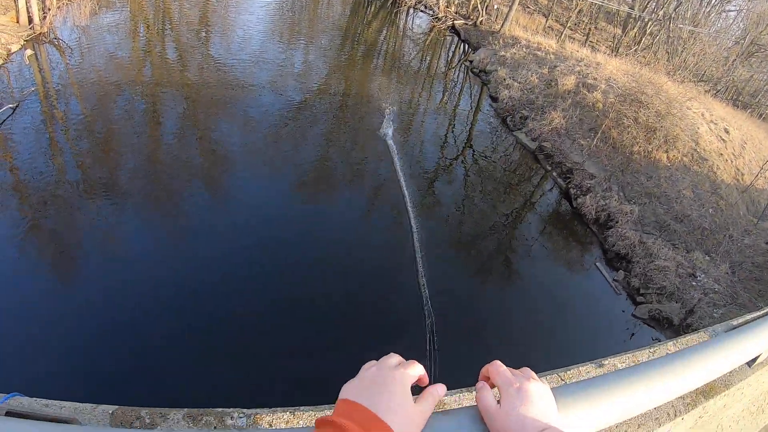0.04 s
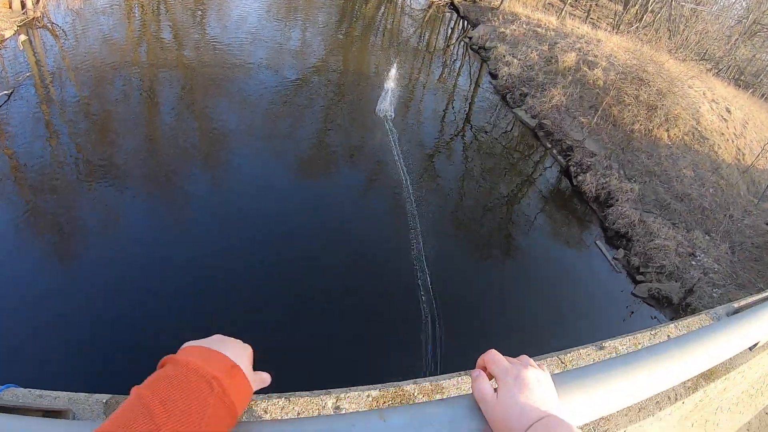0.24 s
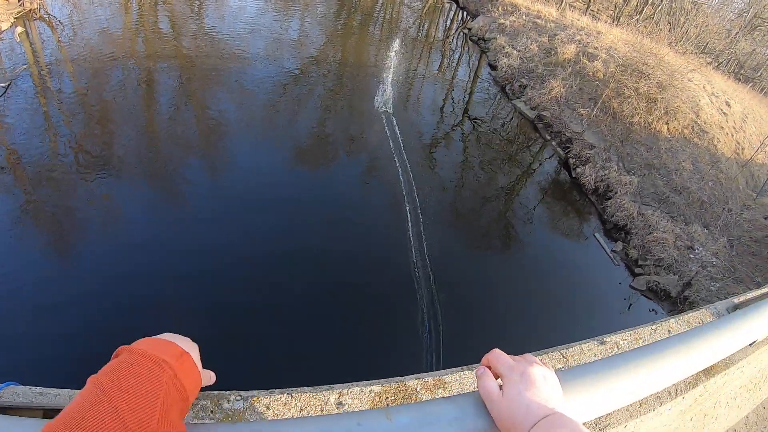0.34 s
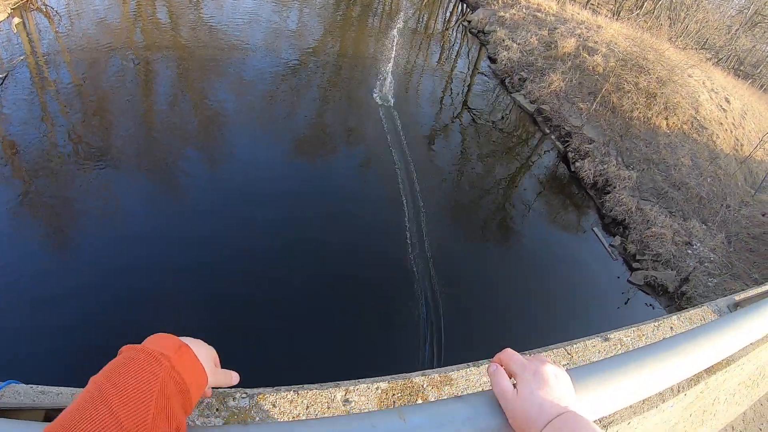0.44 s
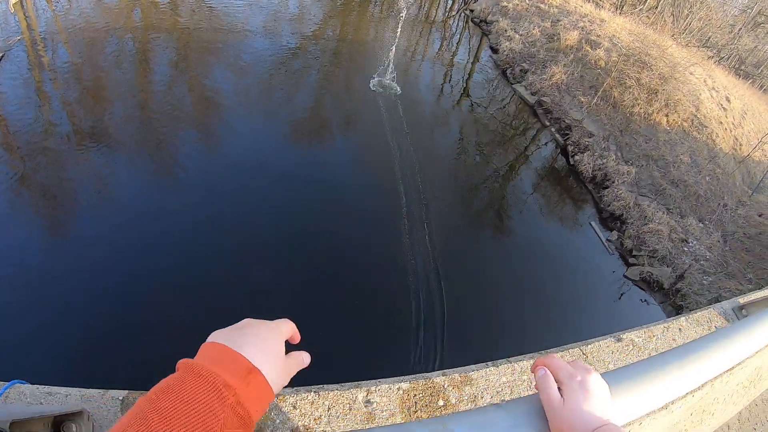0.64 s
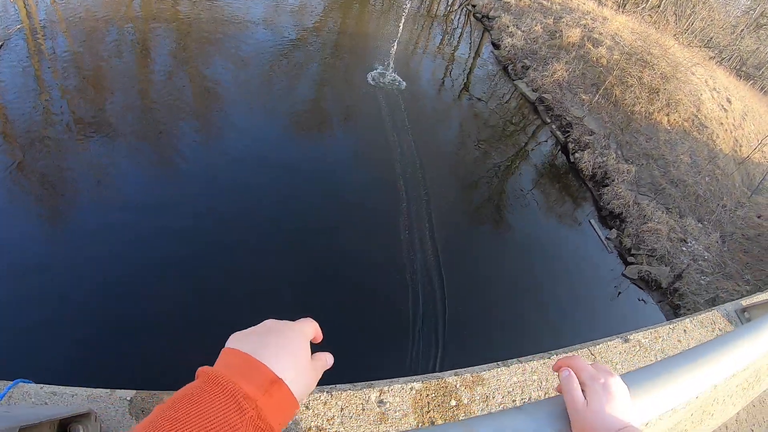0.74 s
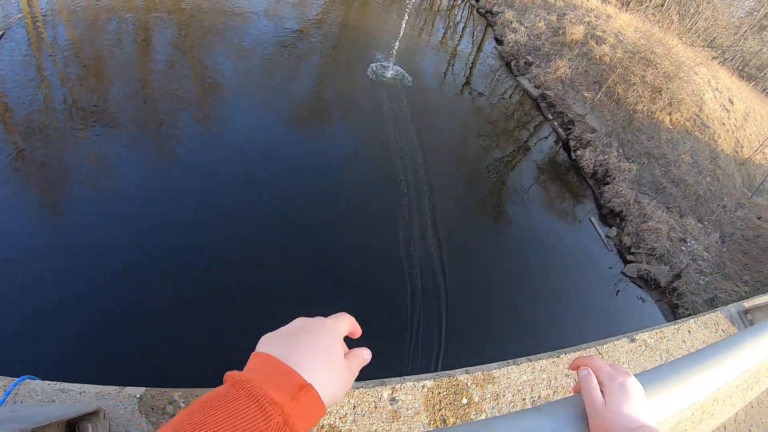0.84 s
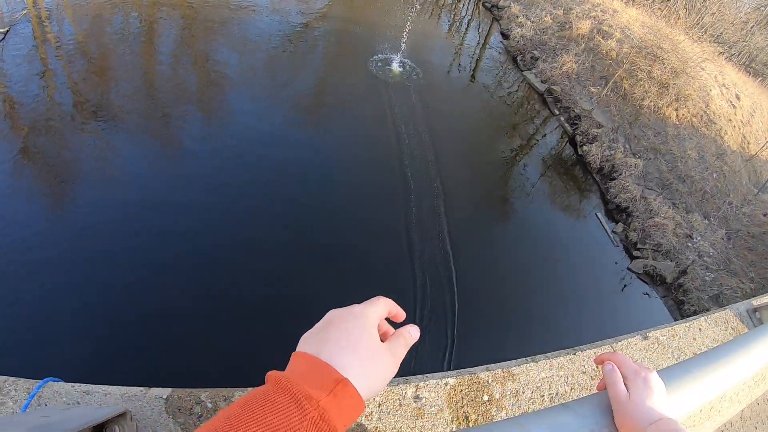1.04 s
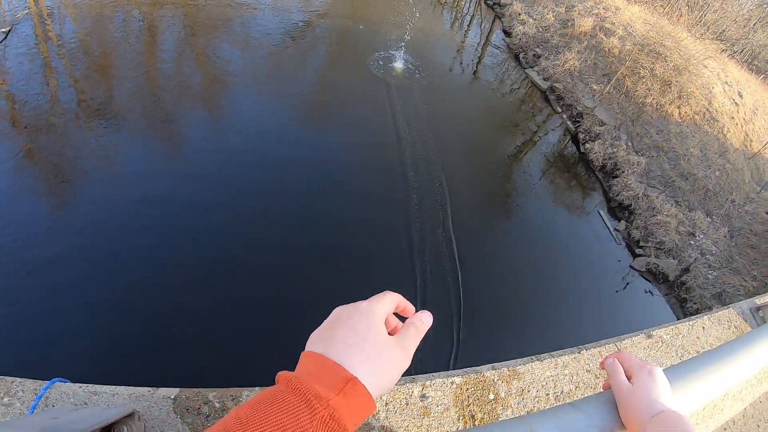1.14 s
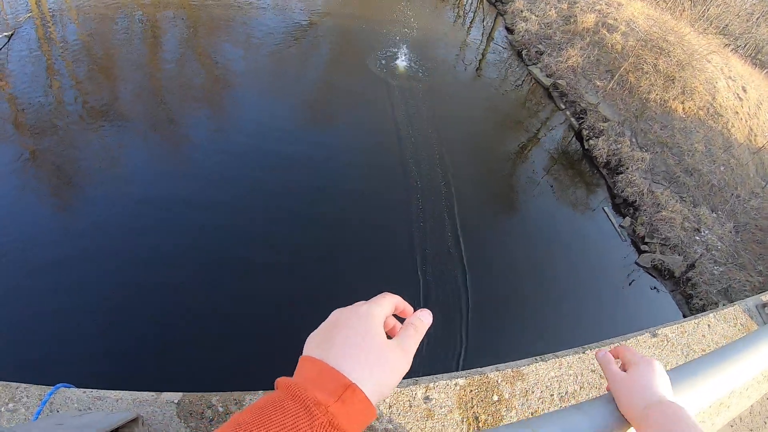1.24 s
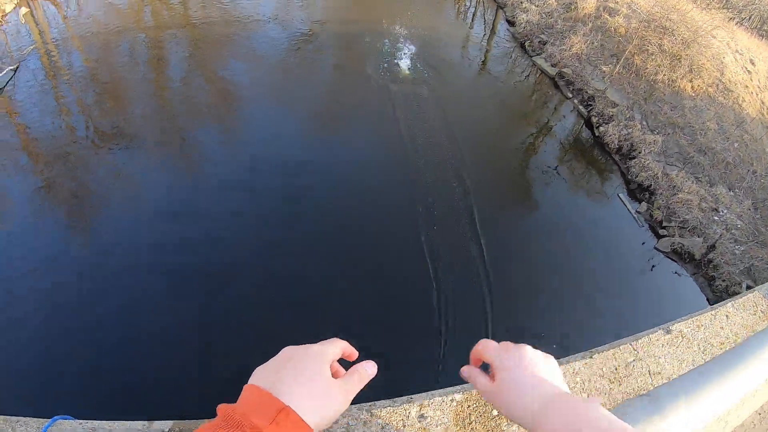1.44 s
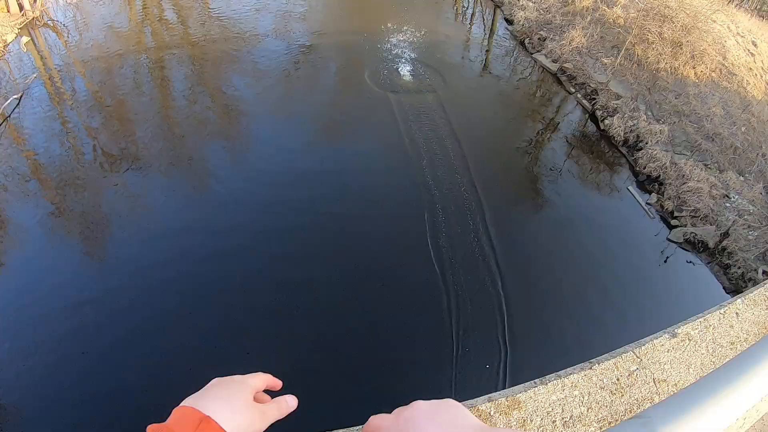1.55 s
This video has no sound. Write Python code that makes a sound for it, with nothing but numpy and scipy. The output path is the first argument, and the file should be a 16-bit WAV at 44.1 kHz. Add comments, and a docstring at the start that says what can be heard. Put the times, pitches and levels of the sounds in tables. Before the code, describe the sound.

A weight slaps into a river with a deep plunk, then gurgles and spray patter back. Outdoors on a bridge, a rope hisses over the railing slightly to the right while light wind buffets the microphone.

```python
"""A weight on a rope plunks into a river below a bridge: it slaps the surface, then its air cavity
pinches off and rings deep. Torn water splashes, trapped air gulps and gurgles, and the thrown water
falls back as spray and drops, while bridge and banks return a faint echo. The rope hisses and sings
over the railing a little to the right, and light wind buffets the microphone above the river's wash."""
import sys
import numpy as np
from scipy import signal
from scipy.fft import rfft, irfft
from scipy.io import wavfile

SR = 44100
rng = np.random.default_rng(int(sys.argv[2]) if len(sys.argv) > 2 else 0)


def generate_wav(sig):
    """Save sig (samples, or channels by samples) to the path in sys.argv[1] as 16-bit PCM at SR."""
    pcm = np.round(np.clip(np.atleast_2d(sig).T, -1, 1) * 32767).astype(np.int16)
    wavfile.write(sys.argv[1], SR, pcm)


N = 70560
TIME = np.arange(N) / SR
BINS = np.fft.rfftfreq(N, 1 / SR)
BUBBLE_RISE_S, TILT_PIVOT_HZ = 0.002, 1880

# The plunk's notes: the main deep ring, then a low boom and two short overtones.
# Each row: pitch in Hz, peak in dB, t60 in seconds.
CAVITY_NOTES = [(142.9, -8, 0.19), (63.2, -23, 0.46), (381, -21.5, 0.098), (538, -21.5, 0.037)]
# Slapback off bridge and banks. Each row: delay in seconds, level against the direct note in dB.
PLUNK_ECHOES = [(0.06, -11.5), (0.089, -24), (0.127, -24), (0.163, -23), (0.21, -25)]
def plunk(start=0.1975, rise=0.0046):
    """The cavity behind the weight pinches off and rings; its main note echoes back."""
    direct = sum(ring(start, hz, db, t60, rise) for hz, db, t60 in CAVITY_NOTES)
    hz, db, t60 = CAVITY_NOTES[0]
    return direct + sum(ring(start + delay, hz, db + echo_db, t60, rise)
                        for delay, echo_db in PLUNK_ECHOES)


# Sheets of water tearing. Each row: start in seconds, hold in seconds, level in dB, t60 in seconds.
SPLASH_BURSTS = [(0.056, 0.0057, -34, 0.15), (0.079, 0.0096, -42.5, 0.062), (0.126, 0.033, -36, 0.016),
                 (.199, 0.0095, -33, 0.21), (0.356, 0.0055, -36, 0.026), (0.399, 0.043, -37.5, 0.67)]
# Splash EQ. Each row: frequency in Hz, gain in dB.
SPLASH_EQ = [(100, -8), (350, -4.5), (700, -8), (1100, -2), (2100, 3), (3500, 1), (4600, -3), (5600, -14),
             (8500, -23.5), (11000, -33), (15500, -35)]
def splashes():
    """Ragged bursts of torn water as the weight goes in and the hole closes."""
    level = sum(amp(db) * envelope(start, 0.0018, hold, t60) for start, hold, db, t60 in SPLASH_BURSTS)
    return level * flutter(rate_hz=400, depth=0.079) * coloured(patter(), SPLASH_EQ)


# Wet smacks. Each row: start in seconds, level in dB, treble tilt in dB per octave.
SLAP_HITS = [(.0542, -29, -2), (0.0626, -28, 0), (0.0692, -24.5, -1.5), (0.1021, -35.5, 4.5),
             (.127, -34, -1), (0.143, -35, 0), (.157, -31, -1.5), (.353, -32.5, -1.5), (.409, -43, -1),
             (0.457, -29.5, -3.5), (0.893, -38, -3), (1.009, -38, -5), (1.2246, -39, 3), (1.2597, -40, 3),
             (1.318, -32, -2), (1.416, -32, -5), (1.4286, -27.5, -1.5), (1.450, -25.5, -3.5),
             (1.485, -45, 0), (1.555, -26.5, 0.5), (1.5683, -44, 7), (1.5724, -30.5, -0.5),
             (1.5905, -32, 2)]
# Slap EQ. Each row: frequency in Hz, gain in dB.
SLAP_EQ = [(200, -5), (900, -2.5), (2000, 4), (4000, -1), (6000, -7.5), (9500, -18), (15500, -57)]
def slaps(rise=0.000763, t60=0.015, crack_db=7):
    """Lumps and drops of water smack the surface, each a sharp crack and a short fizz."""
    crack = amp(crack_db) * unit(amp(spectrum(SLAP_EQ, BINS)))
    fizz = coloured(white(), SLAP_EQ)
    out = 0
    for start, db, tilt in SLAP_HITS:
        burst = rfft(fizz * envelope(start, rise, 0, t60))
        delay = np.exp(-2j * np.pi * BINS * (start + rise))  # lands the crack on the fizz's peak
        out += (burst - crack * delay) * amp(db + tilt * tilt_octaves(BINS))
    return irfft(out, N)


# Single bubbles. Each row: start in seconds, pitch in Hz, peak in dB, t60 in seconds,
# glide in octaves per second.
BUBBLE_NOTES = [(0.042, 208, -38.5, 0.75, 2.5), (0.071, 398, -32, 0.11, -16.5), (.086, 3620, -34, .035, -2),
                (0.09, 165.6, -36.5, 0.41, -1.5), (.135, 616, -38.5, 0.072, 12),
                (.16, 664, -32, 0.14, -6.5), (0.411, 1306, -31, 0.04, 1), (0.892, 358, -30, 0.029, -6),
                (.986, 366, -31.5, 0.03, 8), (1.238, 905, -31, 0.017, -10), (1.267, 1400, -30, 0.02, 8),
                (1.331, 1110, -28, 0.017, 17)]
def bubbles():
    """Smaller air pockets gulp around the plunk and blip among the falling drops."""
    return sum(ring(start, hz, db, t60, BUBBLE_RISE_S, glide)
               for start, hz, db, t60, glide in BUBBLE_NOTES)


# Bubble clusters. Each row: start in seconds, length in seconds, centre pitch in Hz, level in dB.
GURGLE_CLUSTERS = [(0.07, .035, 290, -42), (0.142, .04, 643, -48), (0.404, .05, 1124, -41),
                   (0.469, .035, 323, -39.5), (.48, .045, 967, -48), (.96, .06, 1040, -44),
                   (1.006, .025, 1885, -43), (1.174, 0.046, 906, -47.5), (1.115, 0.072, 280, -41.5)]
def gurgles(count=8, spread_octaves=0.35, t60=0.02):
    """Churned air breaks into short-lived bubbles, scattered in time and size."""
    out = np.zeros(N)
    for start, length, hz, db in GURGLE_CLUSTERS:
        onsets = start + length * (np.arange(count) + rng.random(count)) / count
        pitches = hz * 2 ** (spread_octaves * rng.permutation(np.linspace(-1, 1, count)))
        cluster = sum(ring(at, pitch, 0, t60, BUBBLE_RISE_S) for at, pitch in zip(onsets, pitches))
        out += amp(db) * unit(cluster) * np.sqrt(length * SR / N)  # rms over the cluster's length
    return out


# The spray's ride. Each row: time in seconds, level in dB, treble tilt in dB per octave.
SPRAY_RIDE = [(0, -58, 1), (.05, -54, -1), (.09, -48, 4.5), (.26, -40.5, 1.5), (.335, -42.5, 0),
              (.39, -38, 1), (.45, -38.5, -1), (.53, -40.5, -0.5), (.65, -41.5, -1), (.8, -46, 1),
              (.92, -40, 0.5), (1.01, -39.5, 1.5), (1.1, -41.5, 2), (1.25, -41.5, 2.5), (1.43, -41, 4),
              (1.5, -42.5, 3.5), (1.56, -39.5, 6), (1.6, -41.5, 4.5)]
# Spray EQ. Each row: frequency in Hz, gain in dB.
SPRAY_EQ = [(100, 8), (200, -2), (400, 7), (700, 1), (1100, 1), (1500, -1), (2400, -1), (3600, -3),
            (5000, -11), (8000, -19.5), (9500, -26), (11000, -33.5), (15500, -42.5)]
def spray():
    """Thrown water rains back, brighter as the finest drops land."""
    hz, times, frames = signal.stft(coloured(patter(), SPRAY_EQ), SR, nperseg=256)
    tilt = np.interp(times, TIME, curve(SPRAY_RIDE, column=2))
    frames = frames * amp(tilt_octaves(hz)[:, None] * tilt)
    shower = signal.istft(frames, SR, nperseg=256)[1][:, :N]
    return shower * amp(curve(SPRAY_RIDE)) * flutter(rate_hz=60, depth=0.15)


def patter(bands=48, base_drops_per_s=2800, spread_db=3, q=14, mist_hz=6110, mist_share=0.6):
    """A dense shower of tiny drops, each ringing a few cycles; the finest merge into a smooth mist."""
    drops = np.zeros((2, N))
    for hz in np.geomspace(500, 14000, bands) * rng.uniform(.97, 1.03, bands):
        t = np.arange(0, 2 * q / hz, 1 / SR)
        drop = np.exp(-np.pi * t * hz / q) * np.sin(2 * np.pi * hz * t)
        sizes = amp(spread_db * np.minimum(rng.exponential(1, (2, N)), 4))
        crowd = 1 + (hz / mist_hz) ** 4  # high drops come thicker and softer
        hits = sizes * random_ticks(crowd * base_drops_per_s / bands)
        drops += hz / np.sqrt(crowd) * signal.oaconvolve(hits, drop[None], axes=1)[:, :N]
    return np.sqrt(1 - mist_share) * unit(drops) + np.sqrt(mist_share) * white()


# The rope running out. Each row: time in seconds, level in dB, resonance in Hz,
# relative level of its singing core in dB.
ROPE_RIDE = [(0, -51, 1666, -8), (.5, -49.5, 1649, -6), (.64, -40, 1680, -6.5), (.72, -42, 1724, -1.5),
             (.8, -43.5, 1742, -3.5), (.9, -45.5, 1811, -3.5), (1.02, -45, 1900, -5),
             (1.1, -50.5, 1775, -4), (1.22, -42, 1678, -4), (1.37, -39.5, 1600, -1), (1.44, -38, 1629, -6),
             (1.5, -48, 1663, -3), (1.6, -65, 1620, -7)]
# EQ of the rope's hiss. Each row: frequency in Hz, gain in dB.
ROPE_EQ = [(200, -21), (500, 5.5), (680, -8.5), (900, 1.5), (1400, 4), (2400, -14), (2900, -1.5),
           (3850, -0.5), (4600, -17), (8000, -23.5), (15000, -73)]
def rope(body_db=-3.5, hiss_db=-3.5, stereo_phase_rad=0.48):
    """Fibres rub over the rail: a rough hiss with a singing resonance that drifts with the speed."""
    carrier = np.exp(2j * np.pi * np.cumsum(curve(ROPE_RIDE, column=2)) / SR)
    body = amp(body_db) * waver(width_hz=675)
    core = amp(curve(ROPE_RIDE, column=3)) * waver(width_hz=100)
    spread = np.exp(1j * stereo_phase_rad * np.array([[-.5], [.5]]))
    tone = (carrier * (body + core) * spread).real * pan(db=-7)
    hiss = amp(hiss_db) * coloured(white(), ROPE_EQ) * pan(db=-6)
    return (tone + hiss) * amp(curve(ROPE_RIDE)) * flutter(rate_hz=160, depth=0.42)


# Gusts. Each row: time in seconds, level in dB, left minus right in dB.
WIND_RIDE = [(0, -43.5, 0), (.16, -47, -11), (.25, -31, -4), (.33, -48, -1), (.46, -40.5, 1), (.54, -38, 1),
             (.61, -35, -3), (.72, -36, -6.5), (.76, -31.5, -7), (.85, -32.5, -7), (.92, -37.5, -7),
             (1.02, -37.5, -3), (1.08, -51.5, -3), (1.29, -44, 1.5), (1.48, -50, 2), (1.6, -70, 4)]
# Rumble EQ. Each row: frequency in Hz, gain in dB.
WIND_EQ = [(10, -25), (28, 0.5), (65, 4.5), (100, -3.5), (160, -3.5), (230, -13.5), (400, -29), (1000, -58),
           (4000, -90)]
# The rumble's stereo image. Each row: frequency in Hz, left-right correlation from 0 to 1.
WIND_CORRELATION = [(30, 0.28), (200, 0.73), (1000, 0.31)]
def wind():
    """Fluttering gusts roll over each microphone differently."""
    noise = coloured(white(), WIND_EQ, WIND_CORRELATION)
    rumble = unit(soften(signal.hilbert(noise)).real) * flutter(rate_hz=74, depth=0.22)
    return amp(curve(WIND_RIDE)) * rumble * pan(curve(WIND_RIDE, column=2))


# River EQ. Each row: frequency in Hz, gain in dB.
RIVER_EQ = [(20, -27), (150, 5.5), (290, -0.5), (450, -1.5), (700, -6.5), (1600, -7), (3200, -16.5),
            (5000, -27), (9000, -40.5), (15000, -41)]
def river(level_db=-48):
    """Flowing water lays a steady wash under the scene."""
    return amp(level_db) * coloured(white(), RIVER_EQ)


# Reverb EQ. Each row: frequency in Hz, gain in dB.
TAIL_EQ = [(50, 4), (1000, -21), (10000, -11)]
def banks(sound, return_db=-17):
    """The banks and the bridge scatter a faint tail back."""
    reflections = coloured(random_ticks(per_s=2700), TAIL_EQ)
    tail = reflections * envelope(start=0.0534, rise=0.007, hold=0, t60=0.59)
    return amp(return_db) * signal.fftconvolve(sound, tail / np.linalg.norm(tail[0]), axes=1)[:, :N]


# The default stereo image. Each row: frequency in Hz, left-right correlation from 0 to 1.
STEREO_CORRELATION = [(30, 0.65), (130, 1), (400, 1), (1000, 0.71), (2000, 0.96), (4000, 0.99),
                      (8000, 0.32), (14000, 0.27)]
def coloured(pair, eq, correlation=STEREO_CORRELATION):
    """Gives two unrelated signals an EQ and a stereo image, at rms 1."""
    a, b = rfft(pair) * amp(spectrum(eq, BINS))
    shared = spectrum(correlation, BINS)
    mid, side = a * np.sqrt(1 + shared), b * np.sqrt(1 - shared)
    return unit(irfft(np.array([mid + side, mid - side]), N))


def ring(start, hz, db, t60, rise, glide=0):
    """A pocket of air pulses in the water as a dying sine."""
    age = np.clip(TIME - start, 0, t60)
    cycles = np.cumsum(hz * 2 ** (glide * age) * (TIME > start)) / SR
    return -amp(db) * envelope(start, rise, 0, t60) * np.sin(2 * np.pi * cycles)


def envelope(start, rise, hold, t60):
    """Attack, hold and a release that falls 60 dB in t60; all in seconds."""
    age = TIME - start
    release = np.exp(-np.log(1000) * np.maximum(age - max(hold, rise), 0) / t60)
    return np.clip(age / rise, 0, 1) * release


def flutter(rate_hz, depth):
    """A random gain that wavers up to a rate."""
    slow = unit(irfft(rfft(rng.standard_normal(N)) / (1 + (BINS / rate_hz) ** 4), N))
    return unit(np.exp(depth * slow))


def waver(width_hz):
    """Slow complex noise: the wavering of a resonance of this width."""
    band = signal.sosfilt(signal.butter(2, width_hz / 2, fs=SR, output="sos"), white())
    motion = soften(band[0] + 1j * band[1])
    return motion / np.std(motion.real)


def soften(noise, crest=1.8):
    """Soft-limits the swells of a complex noise to crest times its incoming rms."""
    return noise / np.sqrt(1 + (unit(abs(noise)) / crest) ** 2)


def random_ticks(per_s):
    """Two channels of scattered impulses of either sign."""
    return np.sign(white()) * (rng.random((2, N)) < per_s / SR)


def white():
    """Two unrelated channels of noise."""
    return rng.standard_normal((2, N))


def curve(rows, column=1):
    """One column of a ride at every sample."""
    rows = np.array(rows)
    return np.interp(TIME, rows[:, 0], rows[:, column])


def spectrum(points, hz):
    """Reads points on a log-frequency axis."""
    point_hz, value = np.transpose(points)
    return np.interp(np.log(hz + 1), np.log(point_hz + 1), value)


def tilt_octaves(hz):
    """Octaves above the tilt EQ's pivot, flat below 300 Hz."""
    return np.log2(np.maximum(hz, 300) / TILT_PIVOT_HZ)


def pan(db):
    """Channel gains for a left-minus-right level."""
    return amp(np.array([[.5], [-.5]]) * db)


def amp(db):
    """Decibels to gain."""
    return 10 ** (np.asarray(db) / 20)


def unit(x):
    """Scales to rms 1."""
    return x / np.sqrt(np.mean(x ** 2) + 1e-20)


def scene():
    """Water below, rope and wind close by."""
    water = splashes() + slaps() + bubbles() + gurgles()
    return plunk() + water + banks(water) + spray() + rope() + wind() + river()


# The image opening out. Each row: time in seconds, width from 0 (mono) to 1 (full).
WIDTH_RIDE = [(0, 0.01), (.28, 0.027), (.45, 0.18), (.62, 0.81), (1.6, 1)]
def record(dry, top_hz=7000, top_width=0.52, cutoff_hz=15700):
    """The image opens from near mono, the top treble always a little wide; a steep low-pass follows."""
    mid, side = (dry[0] + dry[1]) / 2, (dry[0] - dry[1]) / 2
    top = irfft(rfft(side) * BINS ** 4 / (BINS ** 4 + top_hz ** 4), N)
    width = curve(WIDTH_RIDE)
    side = width * side + (1 - width) * top_width * top
    lowpass = signal.firwin(511, cutoff_hz, window=("kaiser", 9), fs=SR)
    return signal.oaconvolve(np.array([mid + side, mid - side]), lowpass[None], "same")


dry = scene()
out = record(dry)
generate_wav(out)
```